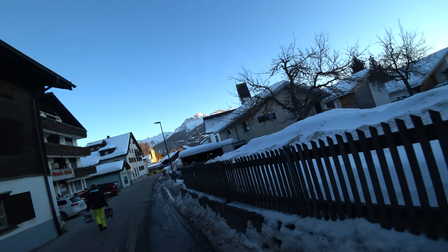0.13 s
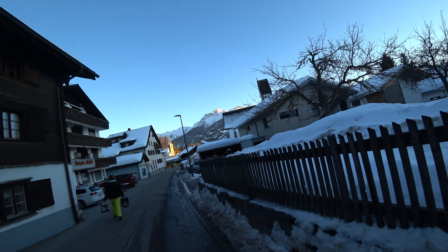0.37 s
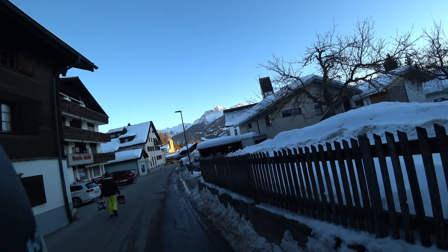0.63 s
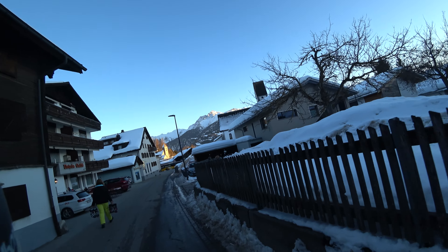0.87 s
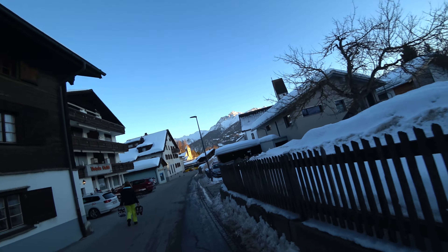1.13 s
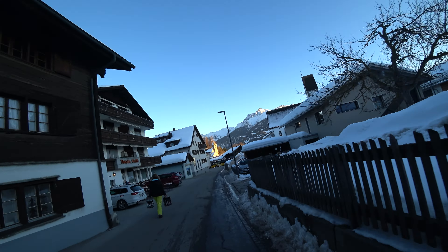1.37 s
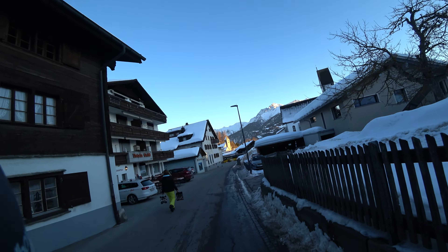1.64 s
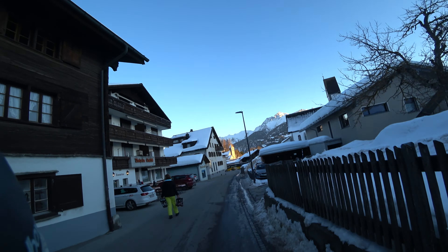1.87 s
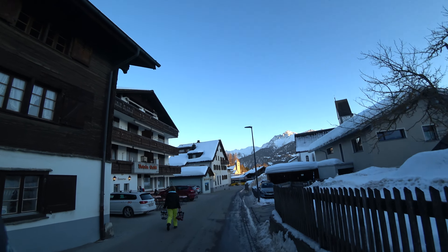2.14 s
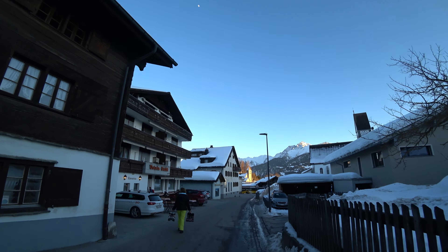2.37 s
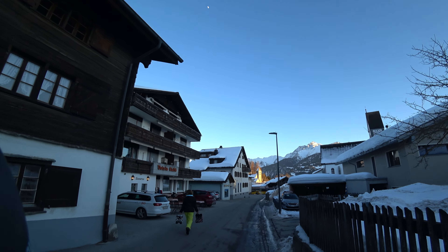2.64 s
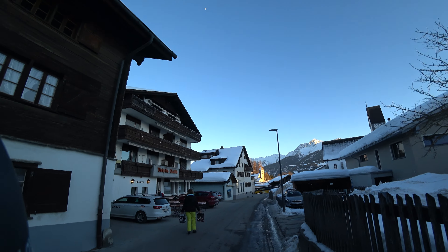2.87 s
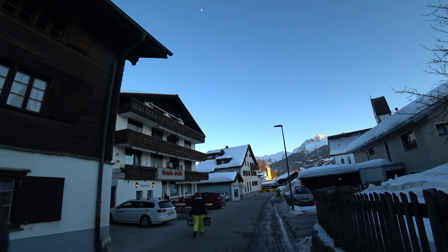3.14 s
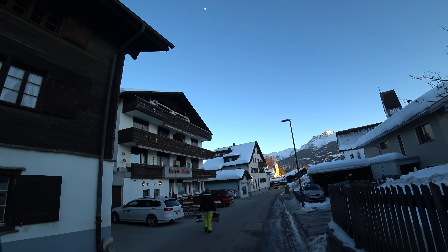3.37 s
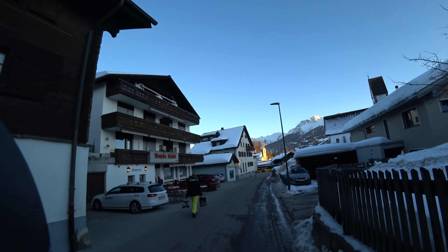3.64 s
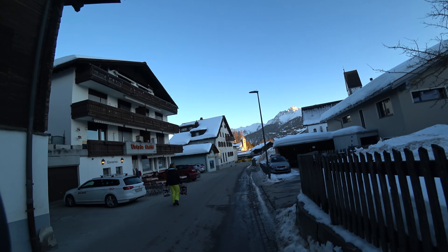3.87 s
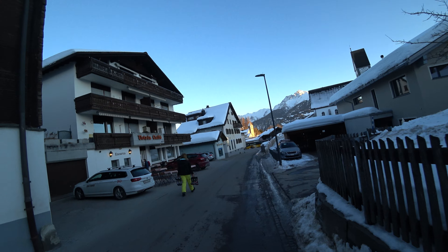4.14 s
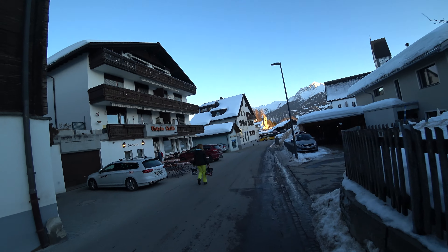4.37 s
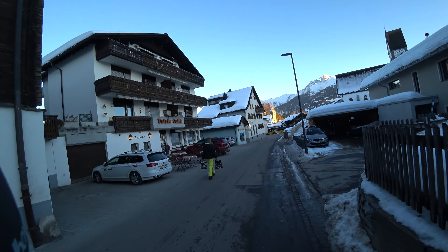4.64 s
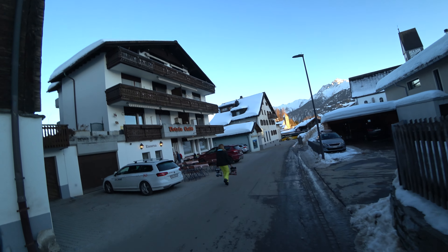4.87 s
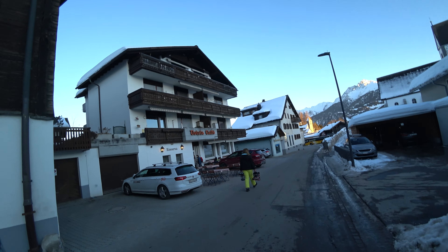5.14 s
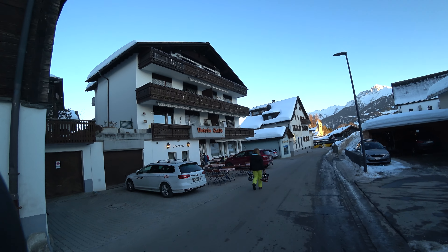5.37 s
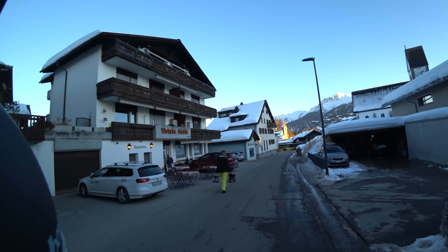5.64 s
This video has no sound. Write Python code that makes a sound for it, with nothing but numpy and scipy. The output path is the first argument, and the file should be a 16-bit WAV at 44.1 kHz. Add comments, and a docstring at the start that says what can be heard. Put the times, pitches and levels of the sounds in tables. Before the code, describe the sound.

Low, soft footfall thumps every half second shake a worn microphone, its housing ticking and knocking, above a wide, faint outdoor hiss.

```python
"""A quiet winter street, heard by the stereo microphone of a camera worn on a walker's body.
From the start a wide far hush with a faint whine, and low trembling of the mount, lie under all: shaped noise.
The first heel lands just before the start; then every half second a footfall travels up the body and
makes the mount bob, knock, rock and sway: decaying low modes. Soon the loose housing rattles at arm's
reach or nearer, as short damped modes with snaps of noise, and the soles scuff faintly: strokes of noise and grains."""
import sys
import numpy as np
from scipy import signal
from scipy.fft import rfft, irfft, next_fast_len
from scipy.io import wavfile
from scipy.ndimage import map_coordinates

SR = 44100
rng = np.random.default_rng(int(sys.argv[2]) if len(sys.argv) > 2 else 0)


def dump(signal):
    """Clip the signal to [-1, 1] and save it as 16-bit WAV at the path in sys.argv[1]."""
    limited = np.clip(np.atleast_2d(signal).T, -1, 1)
    pcm = np.round(limited * 32767).astype(np.int16)
    wavfile.write(sys.argv[1], SR, pcm)


def invert_db(x):
    """Field ratio 10**(x/20) for x, a level in decibels (scalar or array-like)."""
    u = np.asarray(x, float) / 20
    return 10 ** u


N = 254016  # samples

# Colours of noise; only their shape counts, as each noise is levelled afterwards.
# street hush and microphone hiss, common to both ports: (frequency [Hz], density [dB per Hz])
HUSH_MID_COLOUR = [(60, -22), (130, -4.5), (260, -2), (420, -5), (600, -8), (1020, -7), (1500, -9.5),
                   (2100, -13), (3500, -17), (5000, -19.5), (7500, -22), (9100, -24.5), (11000, -20),
                   (15600, -19.5)]
# the same, opposed between the ports: (frequency [Hz], density [dB per Hz])
HUSH_SIDE_COLOUR = [(60, -26), (130, -10), (240, -6), (400, -5.5), (700, -4.5), (1100, -5.5), (1720, -8),
                    (2300, -10.5), (2900, -15.5), (4500, -22), (6800, -28), (9100, -34), (11000, -31.5),
                    (15600, -32)]
# low shaking of the mount: (frequency [Hz], density [dB per Hz])
SHAKE_COLOUR = [(5, -33), (12, 1.5), (30, 2), (45, -4.5), (65, -9.5), (110, -16.5), (200, -26), (400, -66)]
# snap of a contact: (frequency [Hz], density [dB per Hz])
CRACK_COLOUR = [(700, -27), (1400, 6.5), (2800, -2), (4500, -5), (7500, -4.5), (9500, -21)]
# dull rub of the sole: (frequency [Hz], density [dB per Hz])
RUB_COLOUR = [(60, -18), (120, 5), (220, 7), (450, 4.5), (900, -33.5)]
# grit under the sole: (frequency [Hz], density [dB per Hz])
GRIT_COLOUR = [(400, -20), (900, 8), (1500, 8.5), (2300, 3), (3500, -2.5), (9000, -18)]

# footfalls: (heel time [s], knock level [dB], bob level [dB], sole level [dB], sway level [dB])
FOOTFALLS = [(-0.112, -12, -23.5, -39.5, -38), (0.39, -29.5, -33.5, -30, -32),
             (0.886, -34.5, -34, -39.5, -41), (1.372, -27.5, -31, -30, -33),
             (1.86, -28.5, -33.5, -28.5, -36.5), (2.345, -26, -31, -26, -28.5),
             (2.848, -30.5, -26.5, -33, -37.5), (3.342, -22, -30.5, -26.5, -30),
             (3.844, -42.5, -29, -37.5, -41.5), (4.339, -23, -28, -25, -26), (4.839, -27, -27, -32, -33.5),
             (5.306, -29.5, -25, -29.5, -32.5)]
# sideways sway modes, ports opposed; a negative share swings back:
# (frequency [Hz], t60 before the foot's linger [s], rise [s], lag after the heel [s], share of the sway [ratio])
SWAY_MODES = [(25.4, .1, .005, -.003, -.6), (29.4, .31, .012, .015, 1.25), (58, .24, .01, .018, .5)]
# small tugs at the mount as the foot rolls and pushes off: (time [s], level [dB])
FOOT_TUGS = [(0.302, -45), (0.377, -37), (.404, -24.5), (0.871, -34), (1.043, -37), (1.6, -32.5),
             (1.993, -40), (3.009, -39), (3.96, -33), (4.008, -32.5), (4.6, -30.5), (5.001, -30.5),
             (5.431, -42)]
# loose housing above its lowest mode: (frequency [Hz], t60 [s], sideways over common level [dB])
HOUSING_MODES = [(1058, 0.0061, 16), (1975, 0.0078, -10.5), (5000, 0.01, 8)]
# blunt knocks as the housing settles or swings:
# (time [s], lowest mode level [dB], lowest mode frequency [Hz], first housing mode level [dB])
BLUNT_KNOCKS = [(0.2014, -40.5, 230, -51), (0.2422, -47, 234, -70), (0.3711, -45, 338, -53),
                (0.4144, -46, 337, -60), (0.688, -40, 272, -68), (0.7236, -38.5, 260, -66),
                (1.1265, -42, 250, -54), (1.3847, -43, 235, -69), (1.446, -43.5, 336, -62),
                (1.5942, -45, 288, -70), (1.868, -35, 270, -34.5), (2.033, -42, 260, -51),
                (2.3838, -28, 352, -43), (2.8856, -35, 335, -70), (3.3531, -36.5, 260, -33.5),
                (3.371, -32.5, 220, -50), (3.3833, -21, 377, -31.5), (3.8512, -39, 322, -66),
                (4.3627, -43, 252, -51.5), (4.4123, -40, 306, -64), (4.8461, -37.5, 457, -31.5),
                (4.8794, -29, 344, -47), (4.5948, -47.5, 293, -57), (5.3, -42, 457, -51),
                (5.3338, -52, 388, -42.5), (5.3744, -44.5, 337, -63.5)]
# sharp clicks, mostly as the heel lands:
# (time [s], lowest mode level [dB], then the level of each housing mode [dB])
SHARP_CLICKS = [(0.3942, -46.5, -66, -63, -52.5), (0.8835, -40.5, -61, -54, -62),
                (1.3635, -40, -47, -50, -54), (1.855, -34, -53, -40.5, -54), (1.9354, -41, -57, -53, -57),
                (2.342, -38.5, -47, -48, -52.5), (2.4191, -33, -41.5, -41, -63),
                (2.8469, -45, -43.5, -49, -55), (3.3367, -36.5, -40.5, -61, -53),
                (3.8393, -45.5, -47, -44.5, -59), (4.336, -45, -49, -64, -54.5),
                (4.8356, -33, -62, -38.5, -57), (4.93, -65, -60, -70, -57), (5.298, -60, -64, -60, -55.5)]
# the toe drags: (time [s], length [s], rub level [dB], grit level [dB])
TOE_DRAGS = [(1.923, 0.093, -63.5, -66), (2.86, .06, -63, -79), (3.825, 0.044, -68, -72),
             (1.05, 0.042, -76, -71)]


def unit(x):
    """Scaled to rms 1."""
    return x / np.sqrt(np.mean(x ** 2) + 1e-20)


def coloured(x, gain):
    """x times a gain that depends on frequency."""
    size = next_fast_len(N + 8192)
    spectrum = rfft(x, size) * gain(np.fft.rfftfreq(size, 1 / SR))
    return irfft(spectrum, size)[..., :N]


def shaped(points):
    """Gain of (Hz, dB) points read on a log axis."""
    hz, db = np.transpose(points)
    return lambda f: invert_db(np.interp(np.log(f + 1), np.log(hz + 1), db))


def stereo_noise(colour):
    """Independent coloured noise, common and opposed, at rms 1 overall."""
    return unit(coloured(rng.standard_normal((2, N)), shaped(colour)))


def ring(hz, t60, rise, turn=0, size=SR // 2):
    """A damped mode that swells over rise seconds and dies by 60 dB in t60 seconds; turn is its phase."""
    t = np.arange(size) / SR
    decay = invert_db(-60 * t / t60)
    swell = 1 - np.exp(-t / abs(rise))
    return np.sin(2 * np.pi * hz * t + turn) * decay * swell


def add(track, s, sound):
    """Lays a sound at s seconds into a track that starts one second early."""
    i = round((s + 1) * SR)
    track[i:i + len(sound)] += sound


def hush():
    """Steady far noise, wider than it is central, with a faint narrow whine whose level wavers."""
    mid_db, side_db = -66, -59.5
    noise = rng.standard_normal((4, N))
    mid = invert_db(mid_db) * unit(coloured(noise[0], shaped(HUSH_MID_COLOUR)))
    side = invert_db(side_db) * unit(coloured(noise[1], shaped(HUSH_SIDE_COLOUR)))
    whine_hz, width_hz = 2010, 121
    whine_db = (-89, -68)  # (mid, side), before the waver
    whine = unit(coloured(noise[2:], lambda f: 1 / (1 + (2 * (f - whine_hz) / width_hz) ** 2)))
    # twelve random points a second
    waver_db = 2.4 * map_coordinates(rng.standard_normal(80), [np.arange(N) / SR * 12])
    return np.array([mid, side]) + invert_db(np.add.outer(whine_db, waver_db)) * whine


def tremble():
    """Low random shaking of the mount that comes and goes, swells before each step and is stirred up by it."""
    restless_db = np.array([-65, -75.5])  # (mid, side), before the drift
    windup_s, windup_db = 0.048, -55.5
    stir = np.zeros(N + 2 * SR)
    t = np.arange(SR // 2) / SR
    # the swinging leg shakes the mount ever more before the heel lands
    windup = invert_db(windup_db) * np.exp(-t[::-1] / windup_s)
    for s, _, _, sole_db, _ in FOOTFALLS:
        add(stir, s - .005, invert_db(sole_db - 13.5 - 60 * t / 0.5) * (1 - np.exp(-t / 0.002)))
        add(stir, s - len(t) / SR, windup)
    # six random points a second
    places = np.broadcast_arrays([[0], [1]], np.arange(N) / SR * 6)
    drift_db = 3 * map_coordinates(rng.standard_normal((2, 40)), places)
    level = invert_db(restless_db[:, None] + drift_db) + stir[SR:SR + N] * invert_db([[0], [-10]])
    return level * stereo_noise(SHAKE_COLOUR)


def footfalls():
    """The mount sinks before the heel lands, knocks on the blow, rocks when the sole comes down, and sways."""
    knock = ring(60.8, .19, .006)
    rock = ring(28.9, .36, .0033)
    sole_lag_s = .052  # the sole comes down after the heel
    mid, side = np.zeros((2, N + 2 * SR))
    for k, (s, knock_db, bob_db, sole_db, sway_db) in enumerate(FOOTFALLS):
        # bob and sway die faster under one foot than the other: share of t60
        linger = (1.3, .85)[k % 2]
        add(mid, s - .035, -invert_db(bob_db) * ring(17.4, linger * .43, .05))
        add(mid, s, invert_db(knock_db) * knock)
        # the blunt first push of the heel
        add(mid, s, invert_db(bob_db - 24.0) * ring(83, 0.067, 0.0039))
        # the weight drops onto the foot
        add(mid, s + 0.03256, -invert_db(sole_db - 1.5) * ring(46.3, 0.12, 0.0023))
        add(mid, s + sole_lag_s, invert_db(sole_db) * rock)
        add(mid, s + sole_lag_s + 0.0058, invert_db(sole_db - 6.5) * knock)
        for hz, t60, rise, lag, share in SWAY_MODES:
            add(side, s + lag, share * invert_db(sway_db) * ring(hz, linger * t60, rise))
        if k % 2 == 0:  # over this foot the body swings back late
            add(side, s + 0.09, invert_db(-50) * ring(30, 0.2, 0.02))
    for s, db in FOOT_TUGS:
        add(mid, s, invert_db(db) * ring(43, 0.062, 0.0066))
        add(side, s, invert_db(db - 15) * ring(60, 0.06, 0.0037))
    return np.array([mid, side])[:, SR:SR + N]


def contacts(count=12):
    """Every contact as (s, lowest mode dB, its Hz, dB of each housing mode); stray ones fall anywhere."""
    stray_db, scatter_db = -61.5, 11.5
    stray_hz, pitch_scatter = 307, 0.8  # scatter of the log of the pitch
    stray = []
    for u, (a, b) in zip(rng.random(count), rng.standard_normal((count, 2))):
        stray.append((u * N / SR, stray_db + scatter_db * a, stray_hz * np.exp(pitch_scatter * b), stray_db - 24))
    upper_db = (-25, -33)  # upper housing modes of a blunt knock, relative to its lowest
    blunt = [(s, low_db, low_hz, first_db, *np.add(low_db, upper_db))
             for s, low_db, low_hz, first_db in BLUNT_KNOCKS + stray]
    click_low_hz = 303
    sharp = [(s, low_db, click_low_hz, *levels) for s, low_db, *levels in SHARP_CLICKS]
    return blunt + sharp


def rattles():
    """Each loose contact snaps, thuds and rings the housing a little off pitch; harder ones thud more sideways."""
    mid, side, snap = np.zeros((3, N + 2 * SR))
    rows = contacts()
    luck = rng.standard_normal((len(rows), len(HOUSING_MODES), 3))
    for (s, low_db, low_hz, *levels), draws in zip(rows, luck):
        add(mid, s, -invert_db(low_db) * ring(low_hz, 0.02, 0.0023, size=3000))
        thud = ring(0.67 * low_hz, 0.015, 0.00072, size=3000)
        add(side, s - .001, -invert_db(1.37 * low_db + 11.0) * thud)
        for (hz, t60, side_db), db, (up, across, turn) in zip(HOUSING_MODES, levels, draws):
            add(mid, s, invert_db(db) * ring(hz * (1 + .015 * up), t60, .0004, size=3000))
            side_hz = hz * (0.75 + 0.086 * across)
            add(side, s, invert_db(db + side_db) * ring(side_hz, 0.65 * t60, 0.0007, turn, size=3000))
        # the two highest modes set the strength of the snap
        strength = np.hypot(invert_db(levels[-1] - 8), invert_db(levels[-2] - 14))
        add(snap, s, strength * ring(37, 0.018, 0.00071, np.pi / 2, size=600))
    crack = snap[SR:SR + N] * stereo_noise(CRACK_COLOUR)
    return np.array([mid, side])[:, SR:SR + N] + crack * invert_db([[0], [-3]])


def scuffs():
    """A dull rub and dense grains of grit under each short stroke; a heavier sole rubs louder."""
    lead_s, length_s = .018, 0.075  # the stroke starts before the heel lands
    usual_rub_db, grit_db = -64.5, -76.5
    usual_sole_db = np.mean([row[3] for row in FOOTFALLS])
    strokes = TOE_DRAGS + [(s - lead_s, length_s, usual_rub_db + sole_db - usual_sole_db, grit_db)
                           for s, _, _, sole_db, _ in FOOTFALLS]
    t = np.arange(N) / SR
    rub_level, grit_level = np.zeros((2, N))
    for s, length, rub_db, grain_db in strokes:
        arch = np.sin(np.pi * np.clip((t - s) / length, 0, 1))
        rub_level += invert_db(rub_db) * arch
        grit_level += invert_db(grain_db) * arch
    rub = stereo_noise(RUB_COLOUR) * invert_db([[0], [1.5]])
    # about three samples in a hundred hold a grain, at the same instants in mid and side
    grains = rng.standard_normal((2, N)) * (rng.random(N) < .03)
    grit = unit(coloured(grains, shaped(GRIT_COLOUR))) * invert_db([[0], [3]])
    return rub_level * rub + grit_level * grit


def scene():
    """Common (mid) and opposed (side) parts become left and right."""
    mid, side = hush() + tremble() + footfalls() + rattles() + scuffs()
    return np.array([mid + side, mid - side])


def roll_off(x):
    """The treble ends steeply here."""
    return signal.sosfilt(signal.butter(12, 15700, fs=SR, output="sos"), x)


def record(dry):
    """The finished mix as the camera stores it."""
    return roll_off(dry)


dry = scene()
out = record(dry)
dump(out)
```